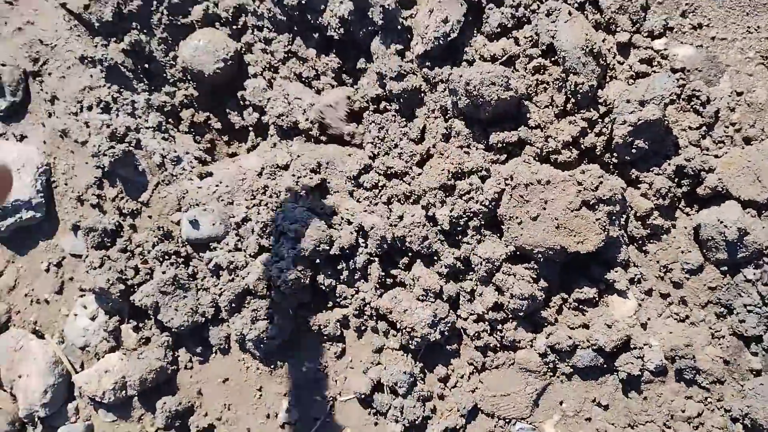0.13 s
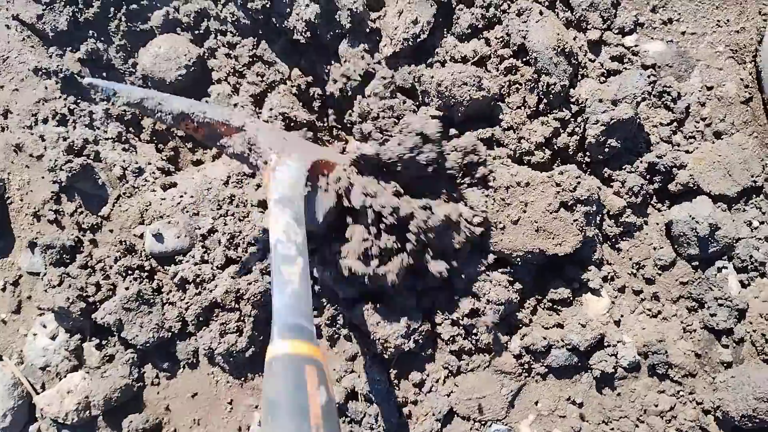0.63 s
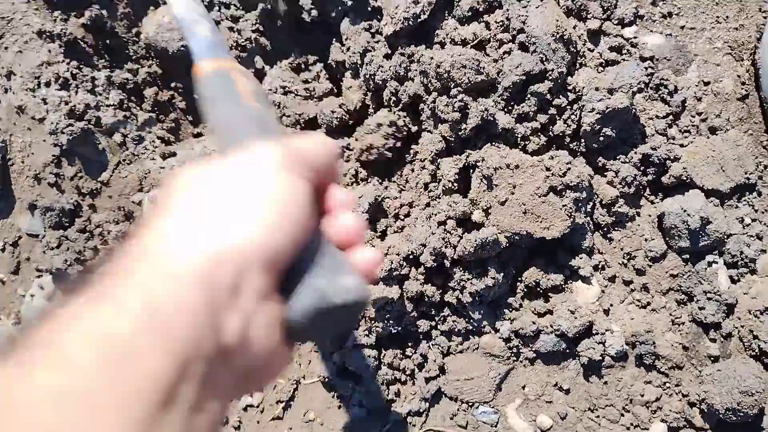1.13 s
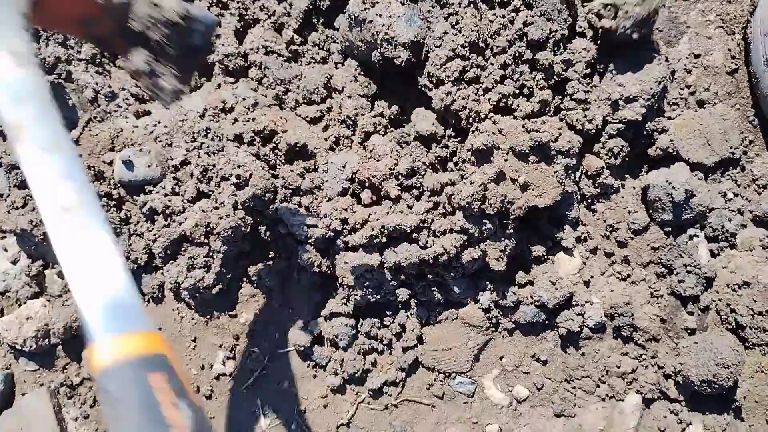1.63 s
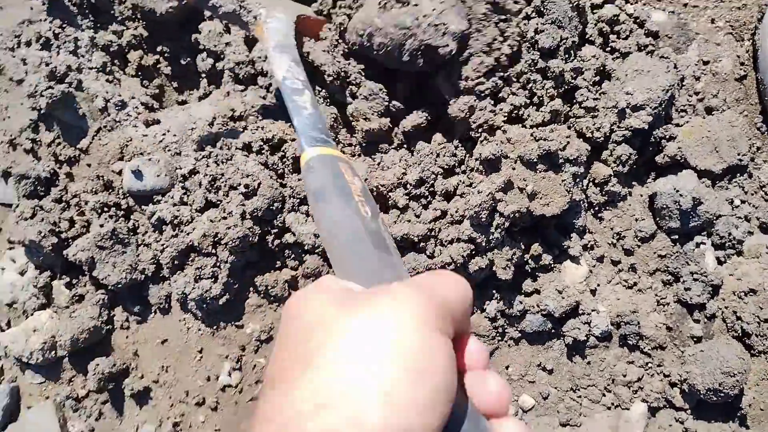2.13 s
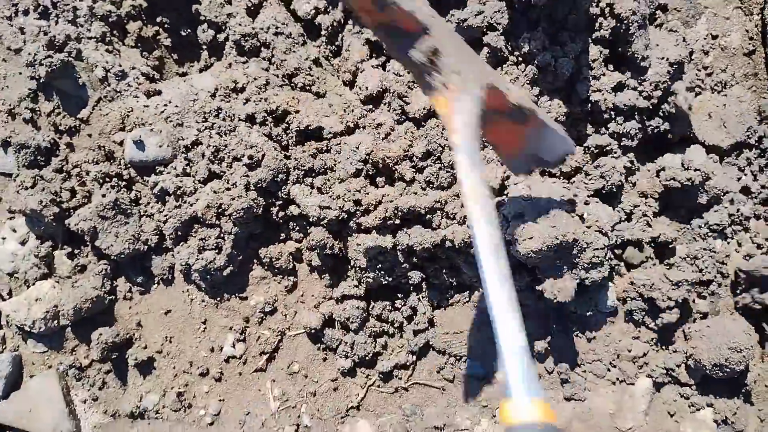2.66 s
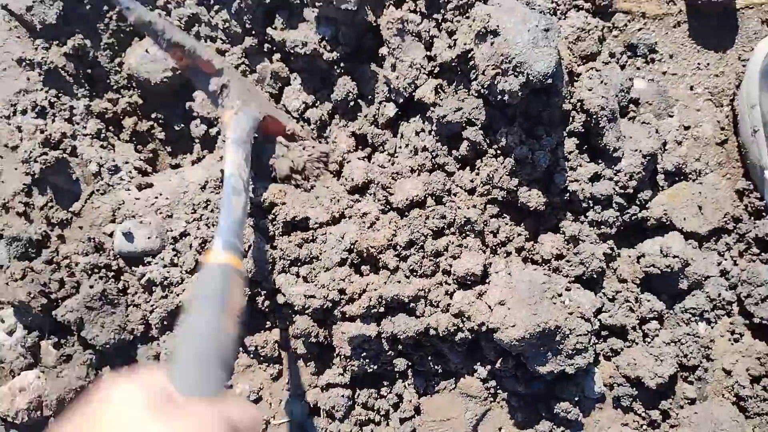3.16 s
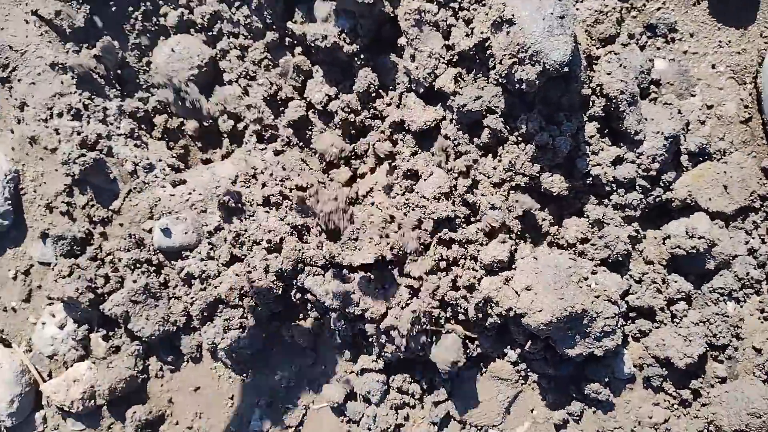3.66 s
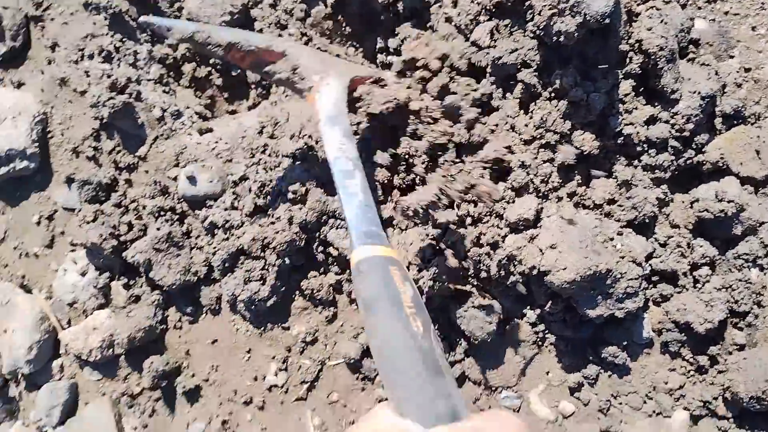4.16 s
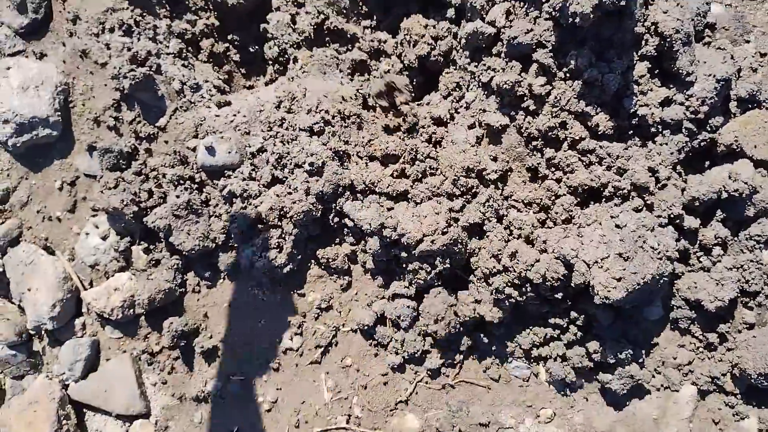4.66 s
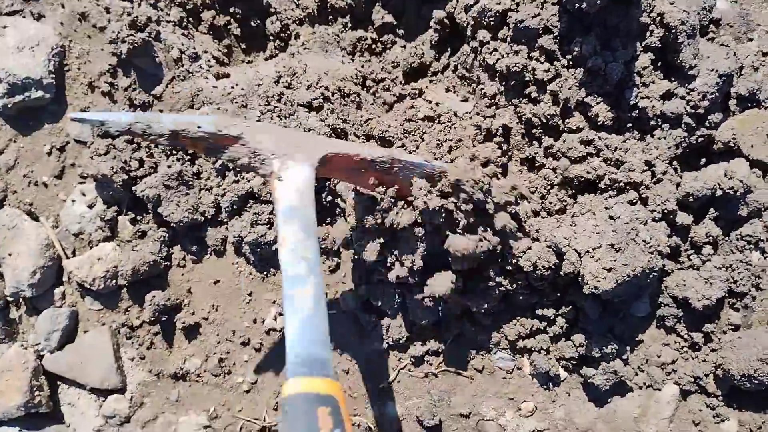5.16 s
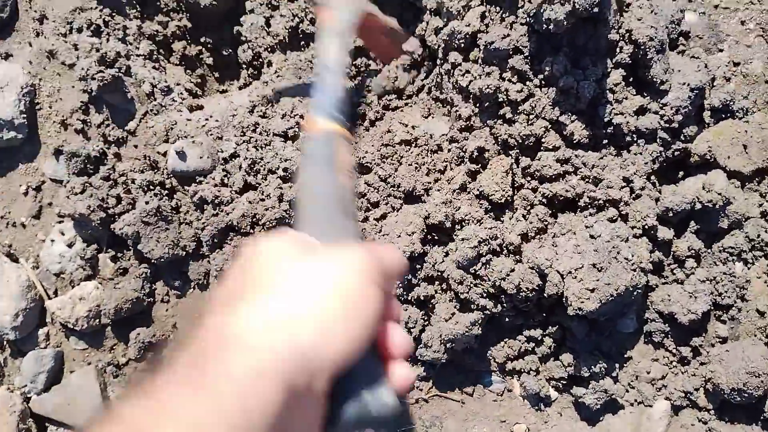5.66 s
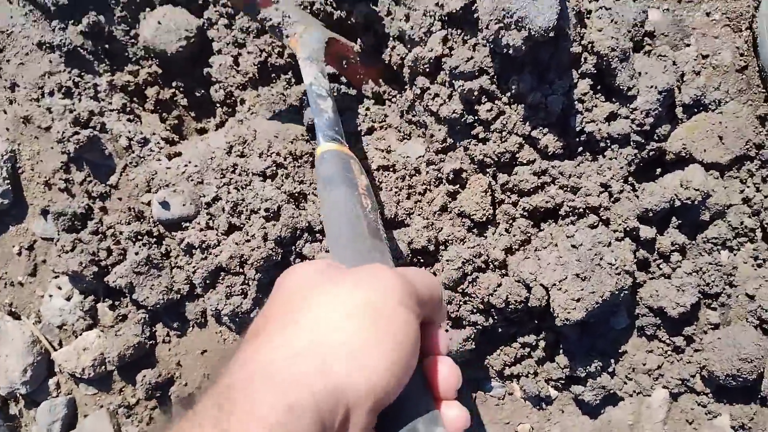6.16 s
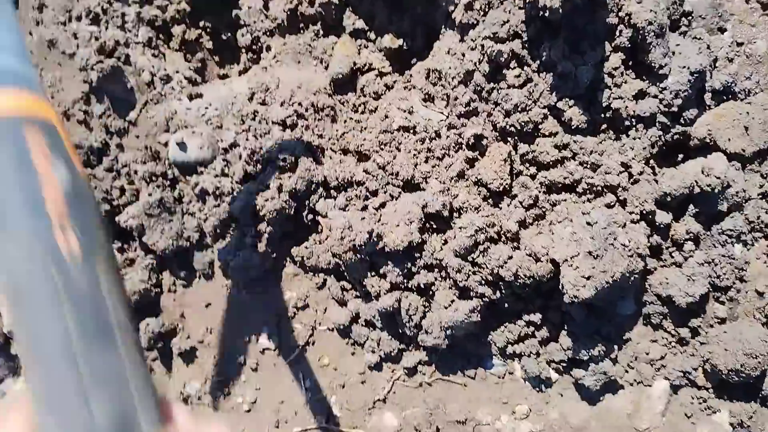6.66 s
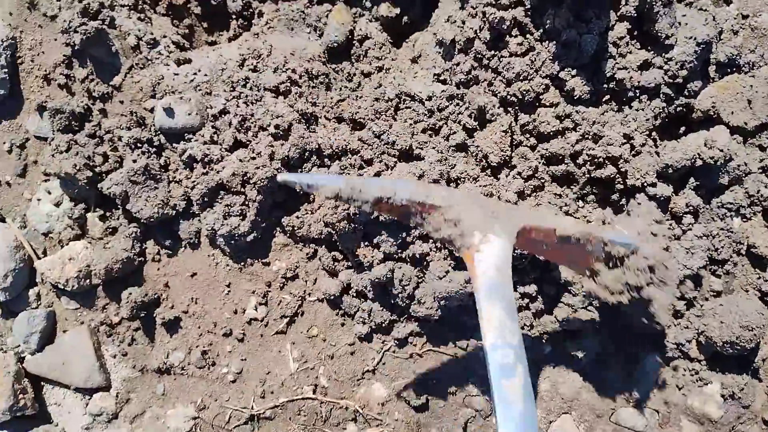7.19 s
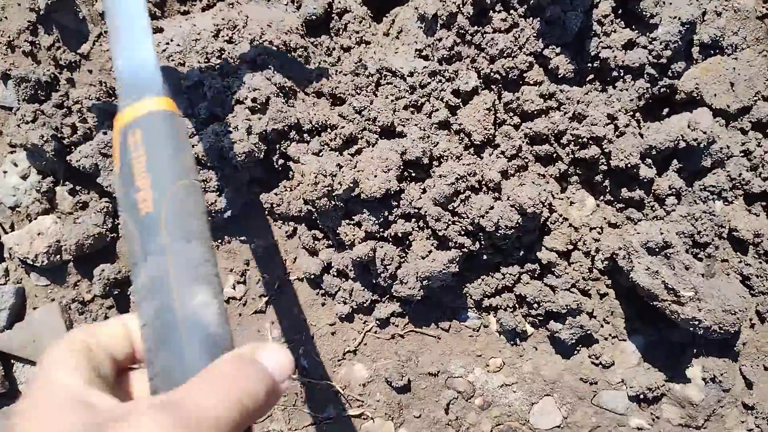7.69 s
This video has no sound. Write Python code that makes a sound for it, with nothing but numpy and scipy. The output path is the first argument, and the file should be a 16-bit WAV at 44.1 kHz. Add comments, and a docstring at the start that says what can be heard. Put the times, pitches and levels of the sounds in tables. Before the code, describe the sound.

Close, steady pick blows crack into hard clay soil, small clods crunching and dirt scraping between strikes, over a very quiet open field.

```python
"""Sharp blows of a hand pick on dry clay, about one a second, close to a small camera outdoors.
Noise rings the blade for each crack, sinking sine waves make the thuds in the ground, and
thousands of tiny pings, coloured over time, make the drag through clods, grit and dust.
A short buzz of harmonics comes now and then. Behind lie a faint wavering hoot, made of
narrow bands of noise, and a far low rumble in the soft hiss of the field."""
import sys
import numpy as np
from scipy import signal
from scipy.fft import rfft, irfft
from scipy.io import wavfile
from scipy.ndimage import uniform_filter1d

SR = 44100
rng = np.random.default_rng(int(sys.argv[2]) if len(sys.argv) > 2 else 0)


def how_loud(loudness_db):
    """Turn decibels into a plain amplitude multiplier (0 dB gives 1, 20 dB gives 10)."""
    steps = np.asarray(loudness_db, float) / 20
    return 10 ** steps


def materialize(psi):
    """Save the field psi as 16-bit PCM at rate SR to the path in sys.argv[1].

    A 1-D psi becomes a single channel; in a 2-D psi each row is a channel.
    """
    bounded = np.clip(np.atleast_2d(psi).T, -1, 1)
    quanta = np.round(bounded * 32767).astype(np.int16)
    wavfile.write(sys.argv[1], SR, quanta)


N = 344421  # length in samples

# Cracks of the blade. Each row: moment of the strike in seconds, overall level in dB, low ring in dB,
# high ring in dB, spray in dB, left-right balance in dB.
CRACKS = [(0.311, -11.5, -42, -11, -9, 4), (0.315, -12.5, -34, -11.5, -25.5, -1),
          (0.32, -18, -10, -29.5, -21, -3), (1.073, -17.5, -7, -27, -19.5, 4),
          (1.078, -8.5, -10, -18, -13.5, 1), (1.256, -31, -0.5, 7.5, -10, 2),
          (1.262, -21.5, -6, -3, -17.5, -8), (1.86, -40, -28, -6.5, -11, -21),
          (1.868, -24, -22.5, -9, -14.5, -0.5), (1.875, -24, -9.5, -28, -22, 0),
          (2.237, -43.5, -40, -2, -9, -8.5), (2.295, -42.5, -1.5, 6, -10, -14),
          (3.082, -7.5, -25.5, -19, -30, 2.5), (3.089, -25.5, -22, -19.5, -12, -14.5),
          (3.094, -24, -10.5, -5, -27, -0.5), (3.298, -34, -35, -13, -26, -16),
          (3.944, -19.5, -7, -25.5, -17, -10.5), (3.949, -11.5, -23.5, -9, -32.5, 4.5),
          (3.994, -31, -20, -21.5, -20, 5.5), (4.04, -28, -16, -11, -24.5, 1),
          (4.842, -17.5, -17.5, -13.5, -18.5, -16), (4.846, -9.5, -11, -18, -34.5, -2.5),
          (4.943, -28, -16, -4.5, -24, -6.5), (4.954, -27.5, -28, -33, -17, -9),
          (5.604, -10, -26, -7, -48, 5.5), (5.609, -23.5, -4, -30, -36, -4), (6.118, -47, -25, 5, -21, -4),
          (6.13, -33, -33, -15.5, -26, -24), (6.135, -20.5, -37, -6.5, -21, 0.5),
          (6.138, -18.5, -15.5, -21, -28, -10), (6.406, -57, 5, -21.5, -22, -3),
          (6.911, -39, -19.5, -36, -47, -2), (6.923, -21, -5.5, -45, -17, -21.5),
          (6.928, -7.5, -16, -11, -25, -0.5), (6.971, -40.5, -7.5, -6, -12.5, -2),
          (7.738, -16.5, -10.5, -10, -13, -2.5), (7.758, -37.5, -30, -6, -4, -16),
          (7.796, -45, -40, 2, -6, -13)]
# The ways the clay-damped blade rings. Each row: pitch in Hz, width in Hz before widening, level in dB.
BLADE = [(894, 430, 2), (1529, 780, 6.5), (1850, 740, -3.5), (2850, 280, -12), (3200, 520, -8),
         (3990, 1400, 1.5), (4810, 1100, 2.5), (6300, 2500, -15.5), (12700, 13000, 10.5)]
# Where a crack's five ring levels apply. A list of: pitch in Hz, for low, middle, upper, high and spray.
RING_HZ = [850, 1500, 2050, 4950, 11000]
MIDDLE_DB, UPPER_DB, CRUNCH_DB = -14, -4, -10.5  # shared by every crack

# Thuds in the ground. Each row: start in seconds, level in dB, pitch it sinks to in Hz,
# time to fall 60 dB in seconds, knock of the handle in dB before a shared lift.
THUDS = [(0.312, -33, 90, 0.088, -32.5), (1.078, -25, 124, 0.02, -38.5), (1.261, -15, 67.3, 0.009, -35.5),
         (1.869, -43, 186, 0.1, -38.5), (1.895, -39, 80.2, 0.063, -46), (3.087, -35.5, 190, 0.099, -61),
         (3.103, -25, 159, 0.035, -42.5), (3.949, -44.5, 159, 0.082, -55.5), (4.788, -50, 70.2, 0.12, -82),
         (4.844, -20.5, 122, 0.032, -24.5), (4.863, -32, 80, 0.072, -60), (4.945, -37, 104, 0.063, -49),
         (5.03, -44, 98, 0.098, -73), (5.607, -33, 105, 0.078, -38), (5.806, -39.5, 76, 0.13, -58),
         (6.136, -61, 76.7, 0.08, -39), (6.281, -48.5, 140, 0.11, -58), (6.463, -53, 80, 0.071, -56),
         (6.644, -44, 91, 0.11, -59.5), (6.925, -32, 154, 0.032, -26.5), (7.089, -55, 112, 0.08, -44.5),
         (7.147, -44, 98.6, 0.13, -67), (7.218, -46, 72, 0.11, -67), (7.297, -50, 119, 0.06, -69),
         (7.74, -59, 132, 0.098, -38.5), (7.756, -33.5, 110.5, 0.064, -58)]

# Earth spilling right after a blow. Each row: moment of the peak in seconds, level in dB before the
# soil colour, time to fall 20 dB in seconds, coarseness in dB.
SPILLS = [(.33, -38, .025, 10), (1.09, -36, .04, 3), (1.275, -58, .02, 22), (1.885, -41, .025, -3),
          (3.1, -49, .045, 8), (3.96, -36, .018, 8), (4.86, -39, .022, -5), (5.62, -66, .02, 30),
          (6.94, -57, .03, 13), (7.757, -36, .017, -14)]
SPILL_RISE_S, SPILL_DUST_DB, SPILL_PAN_DB = 0.0074, -8, -1  # rise: seconds to climb 20 dB
# Scrapes and slides of soil. Each row: moment of the peak in seconds, time to rise 20 dB in seconds,
# time to fall 20 dB in seconds, level in dB before the soil colour, coarseness in dB.
SCRAPES = [(.03, .03, .1, -70, 5), (.2, .15, .15, -71, 5), (.43, .06, .1, -46, 0), (.5, .1, .12, -47, -2),
           (.68, .1, .3, -67, -5), (.995, .03, .025, -67, 7), (1.128, .03, .06, -38, -5),
           (1.24, .1, .03, -46, -4), (1.32, .06, .06, -52, -6), (1.42, .08, .1, -71, 0),
           (1.525, .04, .05, -65, -6), (.92, .1, .08, -71, -2), (1.74, .15, .08, -70, 4),
           (1.975, .05, .06, -58, 10), (2.035, .07, .05, -49, 2), (2.073, .03, .04, -44, 2),
           (2.14, .03, .08, -55, -5), (2.245, .03, .06, -56, -4), (2.298, .02, .03, -45, 4),
           (2.372, .02, .06, -49, -6), (2.589, .03, .03, -49, -8), (3.2, .07, .08, -50, 4),
           (3.28, .08, .08, -46, 2), (3.39, .03, .06, -66, -5), (3.63, .05, .15, -72, 4),
           (4.044, .012, .018, -41, 3), (4.085, .05, .12, -54, -2), (4.3, .15, .25, -73, -4),
           (4.947, .03, .03, -43, 2), (4.99, .06, .07, -53, -2), (5.1, .015, .05, -65, -5),
           (5.23, .08, .08, -73, -4), (5.7, .05, .12, -65, -3), (5.808, .015, .015, -63, 0),
           (5.95, .2, .2, -69, 2), (6.125, .04, .03, -50, 4), (6.172, .04, .025, -53, 5),
           (6.292, .025, .04, -63, 22), (6.335, .045, .065, -68, 26), (4.0, .04, .05, -55, 0),
           (2.33, .04, .04, -57, -4), (2.48, .07, .1, -64, -3), (.36, .03, .05, -53, 0),
           (4.89, .03, .04, -55, -2), (6.409, .006, .015, -70, 26), (6.431, .02, .02, -69, 22),
           (6.465, .015, .05, -66, 18), (6.61, .015, .07, -65, 2), (6.78, .1, .05, -78, 16),
           (6.972, .04, .025, -53, -3), (7.08, .025, .04, -57, 10), (7.135, .05, .07, -66, 30),
           (7.235, .03, .04, -75, 22), (7.295, .03, .06, -70, 15), (7.45, .05, .06, -77, 4),
           (7.626, .03, .03, -70, -5), (7.8, .05, .05, -53, -6)]
SCRAPE_DUST_DB, SCRAPE_PAN_DB = -10, -5
# Showers of dust. Each row: moment of the peak in seconds, time to rise 20 dB in seconds,
# time to fall 20 dB in seconds, level in dB before the soil colour.
SHOWERS = [(.03, .03, .07, -55), (.7, .1, .1, -67), (.865, .02, .03, -63), (.985, .028, .028, -50),
           (1.2, .1, .1, -54), (1.31, .05, .06, -57), (1.42, .08, .1, -69), (1.53, .15, .08, -69),
           (1.99, .07, .06, -60), (2.06, .07, .08, -57), (2.33, .1, .15, -52), (2.54, .07, .05, -54),
           (3.28, .12, .09, -53), (3.7, .08, .04, -68), (3.76, .03, .02, -61), (4.17, .1, .12, -56),
           (4.3, .1, .25, -68), (5.03, .07, .04, -58), (5.23, .08, .07, -68), (5.87, .02, .025, -67),
           (6.29, .025, .04, -66), (6.602, .006, .02, -60), (.958, .008, .03, -59), (6.175, .04, .03, -55),
           (6.45, .1, .09, -69), (6.972, .035, .022, -56), (7.072, .016, .055, -53),
           (7.281, .045, .05, -63), (7.59, .025, .045, -67)]
SHOWER_PAN_DB = -6
# Clods and blade compared with the grit; coarseness lifts the clods fully and the blade by a share.
CLODS_DB, BLADE_DB, BLADE_SHARE = -9, 0, 0.62
# Loose earth never quite rests. A list of: level in dB before flicker and soil colour,
# for clods, blade, grit and dust.
TRICKLE_DB = [-79, -81, -85, -82]
TRICKLE_FLICKER_DB = 2.5
# Colour of dragged soil. Each row: pitch in Hz, level in dB.
SOIL = [(100, 5), (300, 11), (800, 7.5), (1600, 6.5), (2100, 8.5), (2700, 6), (3700, 9.5), (5000, 8),
        (5900, 3.5), (6600, 2), (8600, -0.5), (10500, 6), (14000, 3.5)]
# Where clods, blade, grit and dust sound, in that order. A list of: pitch in Hz.
SOIL_HZ = [500, 1800, 4200, 11500]

# The buzz. Each row: start in seconds, level in dB before a shared cut, time before it fades in seconds,
# brightness in dB per octave, roughness from 0 to 1.
BUZZES = [(2.5747, -43, 0.024, -1.5, 0), (3.558, -51, 0.025, -1.8, 0.47), (4.616, -60.5, 0.018, -2, 0.61),
          (5.095, -63, 0.012, -2, 0.03), (6.602, -51, 0.038, -5.5, 0.7), (7.61, -61.5, 0.012, -5.5, 0.36)]
# The small hard body that the buzz rings. Each row: pitch in Hz, level in dB.
BUZZ_BODY = [(530, -49), (900, -20.5), (1390, -7), (2630, -5.5), (3380, 1), (4240, -8), (4620, 2.5),
             (6470, -16), (7530, 3.5), (8670, -46), (12000, -26), (15600, -58), (22000, -120)]
BUZZ_HZ = 355  # spacing of the harmonics

# The far hoot. Each row: time in seconds, level in dB and upper band in dB, both before a shared cut.
HOOT = [(0.0, -78, -76), (0.67, -74.5, -86), (1.05, -84, -78.5), (1.37, -73, -74), (1.72, -89, -73),
        (2.101, -73, -60), (2.41, -66, -62), (2.65, -92.5, -87.5), (3.1, -81.5, -90.5), (3.37, -73.5, -79),
        (3.85, -78, -74.5), (4.3, -87.5, -77.5), (4.6, -83.5, -68.5), (5.0, -76, -83.5), (5.6, -93.5, -89),
        (5.78, -75, -75), (6.2, -86.5, -70), (7.81, -75.5, -75)]
HOOT_HZ, WAVER_HZ = 477, 18  # middle pitch, and its typical drift to either side

# Quiet of the field, as a colour only. Each row: pitch in Hz, level in dB per Hz.
AIR = [(24, -31.5), (40, 3), (102, 3), (198, -6), (235, -4), (279, -19), (332, -9), (457, -15.5),
       (599, -16.5), (747, -17.5), (1110, -23.5), (3980, -25), (4730, -25), (10600, -27.5), (14300, -35.5)]
AIR_DB = -64  # overall level of field and rumble together
# How alike the field is at left and right. Each row: pitch in Hz, likeness (held within -1 to 1).
AIR_SAME = [(60, 0.18), (130, 0.85), (290, 0.6), (630, -0.36), (1380, -2), (3030, -0.1), (6650, -0.23),
            (14600, -0.66)]
# Swells of the low rumble. Each row: time in seconds, level in dB, where -68 leaves the field as it is.
RUMBLE = [(0.0, -71), (0.48, -67), (0.8, -73), (1.28, -63.5), (1.8, -70), (2.0, -67.5), (2.96, -73.5),
          (3.15, -66), (3.52, -73), (4.0, -64.5), (4.4, -70.5), (4.74, -69), (5.44, -71), (6.2, -70),
          (6.48, -65), (6.95, -70.5), (7.15, -63.5), (7.81, -68)]

# The two microphone ports. Each row: pitch in Hz, left-right difference in dB.
PORTS = [(60, -1.5), (110, 0.5), (200, 7), (370, 2), (690, 11), (1270, -2.5), (2340, -3), (4300, -1.5),
         (7920, -2), (14600, -10.5)]
LOW_HZ, EDGE_HZ = 53.7, 14500  # lowest and highest pitch let through


def evened(x):
    """Scales a sound or a random curve to an rms (average strength) of 1."""
    return x / np.sqrt(np.mean(x ** 2) + 1e-20)


def read(points, hz):
    """Reads a table of pitch and value, with pitch on a log axis as the ear hears it."""
    f, value = np.transpose(points)
    return np.interp(np.log(hz + 1), np.log(f + 1), value)


def add(mix, s, sound):
    """Adds a stereo sound to the mix at s seconds."""
    part = mix[:, round(s * SR):][:, :sound.shape[1]]
    part += sound[:, :part.shape[1]]


def resonate(x, hz, width):
    """A resonance of gain 1 that can follow a changing pitch: shift down, smooth, shift back up."""
    turn = np.exp(2j * np.pi * np.cumsum(hz * np.ones(x.shape[-1])) / SR)
    r = np.exp(-np.pi * width / SR)
    return 2 * (turn * signal.lfilter([1 - r], [1, -r], x / turn)).real


def shaped(x, field, size):
    """Colours x over time: field(hz, t, z) changes its short-time spectra z."""
    hz, t, z = signal.stft(x, SR, nperseg=size, noverlap=size * 3 // 4)
    back = signal.istft(field(hz, t, z), SR, nperseg=size, noverlap=size * 3 // 4)[1]
    return back[..., :x.shape[-1]]


def ports(x, pan_db, lag_s, scatter):
    """One near source at two ports: a lag, a level tilt, and treble scattered by the camera body."""
    hz = np.fft.rfftfreq(len(x), 1 / SR)
    ripple = sum(np.sin(hz / p + 2 * np.pi * rng.random()) for p in (300, 520, 900))
    phase = np.pi * hz * lag_s + scatter * ripple * hz / 8000
    half = how_loud((read(PORTS, hz) + pan_db) / 2) * np.exp(1j * phase)
    # each port takes half of the difference, in opposite directions
    return irfft(rfft(x) * np.array([half, 1 / half]), len(x))


def crack(db, low_db, high_db, spray_db, pan_db):
    """The edge bites in, then breaking crust rings the blade; a softer crunch follows."""
    t = np.arange(-512, 3584) / SR  # the strike is at 0
    after = np.maximum(t, 0)
    bite = how_loud(-32 - 60 * abs(t) / 0.03)
    snap = (1 - np.exp(-after / 0.0004)) * how_loud(-60 * after / 0.006)
    crunch = (t >= 0) * how_loud(CRUNCH_DB - 60 * after / 0.039)
    drive = (bite + snap + crunch) * rng.standard_normal(len(t))
    levels = [low_db, MIDDLE_DB, UPPER_DB, high_db, spray_db]
    ring = 0
    for hz, width, mode_db in BLADE:
        lean_db = np.interp(np.log(hz), np.log(RING_HZ), levels)
        part = resonate(resonate(drive, hz, width * 1.2), hz, width * 1.2)
        ring = ring + how_loud(mode_db + lean_db) * part / abs(part).max()
    return how_loud(db) * ports(ring, pan_db, lag_s=0.00006, scatter=0.83)


def thud(db, hz, t60, knock_db):
    """The ground gives and swings back, sinking in pitch; the handle knocks above it."""
    t = np.arange(8192) / SR
    turns = np.cumsum(hz * (1 + 0.3 * np.exp(-t / 0.0066))) / SR
    swing = np.sin(2 * np.pi * (turns + [[0], [0.04]]))  # right is slightly ahead in its cycle
    swing = swing * how_loud(db - 60 * t / t60) * (1 - np.exp(-t / 0.0011))
    # loose earth roughens the swing
    loose = 1 + 0.3 * evened(uniform_filter1d(rng.standard_normal((2, len(t))), 400))
    knock = np.sin(2 * np.pi * (310 * t + [[0], [0.05]]))
    knock = knock * how_loud(knock_db + 4.5 - 60 * t / 0.033) * (1 - np.exp(-t / 0.00023))
    return swing * loose + knock * how_loud([[2], [-2]])


def drags():
    """Crumbs of soil break on the blade in clumps; coarse and fine ones swell apart."""
    grains = crumbs(per_s=320, spread_db=3.1, cycles=7) + 0.7 * rng.standard_normal((2, N))
    clumps = how_loud(1.3 * evened(uniform_filter1d(rng.standard_normal(N), 500)))

    def field(hz, t, z):
        power, pan_db = soil_power(t)
        # blend the four kinds of soil smoothly across pitch
        weights = np.array([np.interp(np.log(hz + 1), np.log(SOIL_HZ), one) for one in np.eye(4)]).T
        level_db = weights @ (10 * np.log10(power))
        # left and right grow less alike with pitch
        same = np.clip(0.9 - 1.1 * hz / 10000, 0, 1)[:, None]
        lag = np.exp(2j * np.pi * hz * 0.00012)[:, None]
        side = how_loud(pan_db / 2 * np.clip(hz / 2500, 0, 1.3)[:, None])
        right = (same * z[0] + np.sqrt(1 - same ** 2) * z[1]) * lag
        pair = np.array([z[0] * side, right / side])
        # the blade sings in short streaks
        streaks = evened(uniform_filter1d(rng.standard_normal(z[0].T.shape), 40, 0)).T
        return pair * how_loud(read(SOIL, hz)[:, None] + level_db + 2.2 * streaks)
    return shaped(evened(grains * clumps), field, size=256)


def crumbs(per_s, spread_db, cycles):
    """Each crumb is a short ping at one of 28 pitches, dying over some cycles; a few are large."""
    out = np.zeros((2, N))
    for hz in np.geomspace(250, 13500, 28):
        t = np.arange(int(4 * cycles * SR / hz) + 2) / SR
        ping = np.sin(2 * np.pi * hz * t) * np.exp(-t * hz / cycles) * (1 - np.exp(-t * hz))
        size = how_loud(spread_db * np.minimum(rng.exponential(1, (2, N)), 4))
        # per_s is the rate at 3000 Hz; higher pings come more often
        hits = rng.random((2, N)) < per_s * (hz / 3000) ** 0.7 / SR
        out += np.sqrt(hz) * evened(signal.oaconvolve(size * hits, ping[None], axes=1)[:, :N])
    return evened(out)


def soil_power(t):
    """Power of clods, blade, grit and dust over time, and where it stands left-right."""
    def mix(coarse, dust_db):
        return np.array([CLODS_DB + coarse, BLADE_DB + BLADE_SHARE * coarse, 0, dust_db])[:, None]

    spills = sum(how_loud(db + mix(coarse, SPILL_DUST_DB) + swell(t, s, SPILL_RISE_S, fall, curve=1)) ** 2
                 for s, db, fall, coarse in SPILLS)
    scrapes = sum(how_loud(db + mix(coarse, SCRAPE_DUST_DB) + swell(t, s, rise, fall)) ** 2
                  for s, rise, fall, db, coarse in SCRAPES)
    showers = sum(how_loud(db + swell(t, s, rise, fall)) ** 2 for s, rise, fall, db in SHOWERS)
    showers = showers * np.array([[0], [0], [0], [1]])  # dust only
    flicker = evened(uniform_filter1d(rng.standard_normal((len(t), 4)), size=14, axis=0)).T
    trickle = how_loud(np.c_[TRICKLE_DB] + TRICKLE_FLICKER_DB * flicker) ** 2
    scrapes = scrapes + trickle
    power = spills + scrapes + showers
    # the stronger source pulls the balance its way
    pan_db = SPILL_PAN_DB * spills + SCRAPE_PAN_DB * scrapes + SHOWER_PAN_DB * showers
    return power, pan_db.sum(0) / power.sum(0)


def swell(t, peak, rise, fall, curve=2):
    """Decibels relative to the peak: a rounded rise, then a rounded (2) or straight (1) fall."""
    return -20 * np.where(t < peak, ((peak - t) / rise) ** 2, abs((t - peak) / fall) ** curve)


def buzz(db, length, tilt_db, rough):
    """Harmonics, as of steady clicks, ring a small hard body; roughness smears the lines."""
    t = np.arange(4096) / SR
    hz = BUZZ_HZ * np.arange(2, 36)[:, None]
    uneven_db = 1.8 * rng.standard_normal(hz.shape)
    lines = how_loud(read(BUZZ_BODY, hz) + tilt_db * np.log2(hz / 3000) + uneven_db)
    waver = np.clip(rough, 0, 1) * np.cumsum(rng.standard_normal((len(hz), len(t))), axis=1) * 0.08
    # every line trembles at its own rate
    tremble_turns = rng.uniform(25, 63, hz.shape) * t + rng.random(hz.shape)
    lines = lines * (1 + 0.5 * np.sin(2 * np.pi * tremble_turns))
    tone = evened((lines * np.cos(2 * np.pi * hz * t + waver)).sum(0))
    shape = np.clip(t / 0.012, 0, 1) * how_loud(-60 * np.maximum(t - length, 0) / 0.066)
    return how_loud(db - 6.0) * tone * shape * how_loud([[-3], [3]])


def hoot():
    """A faint fuzzy tone, noise in a narrow drifting resonance, with a wider band of noise above it."""
    s, *columns = np.transpose(HOOT)
    db, upper_db = (np.interp(np.arange(N) / SR, s, column) for column in columns)
    first, upper, drift = rng.standard_normal((3, N))
    drift = evened(uniform_filter1d(uniform_filter1d(drift, size=8000), size=8000))
    hz = HOOT_HZ + WAVER_HZ * drift
    tone = evened(resonate(resonate(first, hz, 30), hz, 30))
    band = evened(resonate(resonate(upper, 1500, 200), 1500, 200))
    return how_loud(db - 4.5) * tone + how_loud(upper_db - 10.5) * band


def air():
    """Faint hiss of the open field, coloured noise with a lumpy rumble that swells below."""
    def field(hz, t, z):
        same = np.clip(read(AIR_SAME, hz), -1, 1)[:, None]
        patches = uniform_filter1d(rng.standard_normal(z[0].T.shape), 4, 0)
        patches = evened(uniform_filter1d(patches, 10, 1)).T
        # the rumble works below 500 Hz, and fully from about 250 Hz down
        below = np.clip(np.log2(500 / (hz + 1)), 0, 1)[:, None]
        lift_db = (np.interp(t, *np.transpose(RUMBLE)) + 68) * below
        pair = np.array([z[0], same * z[0] + np.sqrt(1 - same ** 2) * z[1]])
        return pair * how_loud(read(AIR, hz)[:, None] + 1.8 * patches + lift_db)
    return how_loud(AIR_DB) * evened(shaped(rng.standard_normal((2, N)), field, size=2048))


def scene():
    """All sources together at the two microphones."""
    mix = drags() + air() + hoot()
    for s, *row in CRACKS:
        add(mix, s - 512 / SR, crack(*row))  # the bite begins before the strike
    for s, *row in THUDS:
        add(mix, s, thud(*row))
    for s, *row in BUZZES:
        add(mix, s, buzz(*row))
    return mix


def roll_off(x):
    """The treble ends steeply here."""
    return signal.sosfilt(signal.butter(12, 15180, fs=SR, output="sos"), x)


def record(dry):
    """The microphone drops the lowest bass and the recorder the top treble."""
    low_cut = signal.sosfilt(signal.butter(2, LOW_HZ, "high", fs=SR, output="sos"), dry)
    edge = signal.firwin(255, EDGE_HZ, window=("kaiser", 4), fs=SR)
    finished = signal.oaconvolve(low_cut, edge[None], "same", axes=1)
    return roll_off(finished)


dry = scene()
out = record(dry)
materialize(out)
```